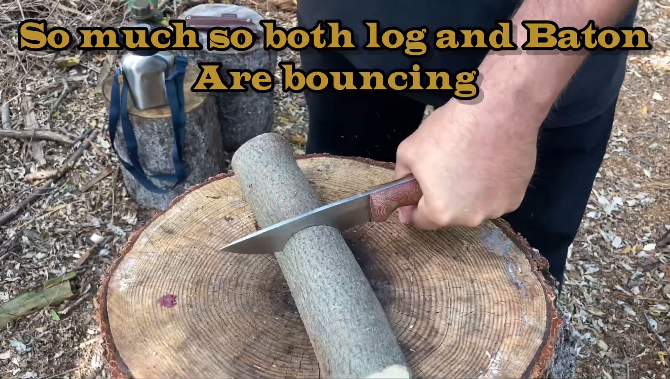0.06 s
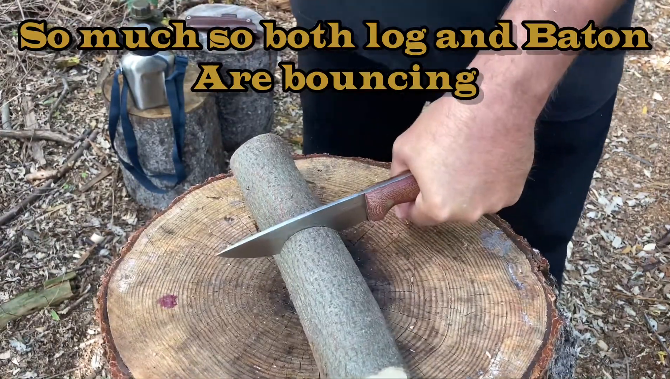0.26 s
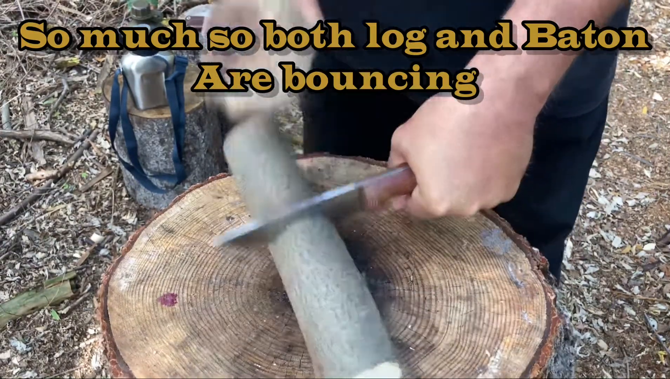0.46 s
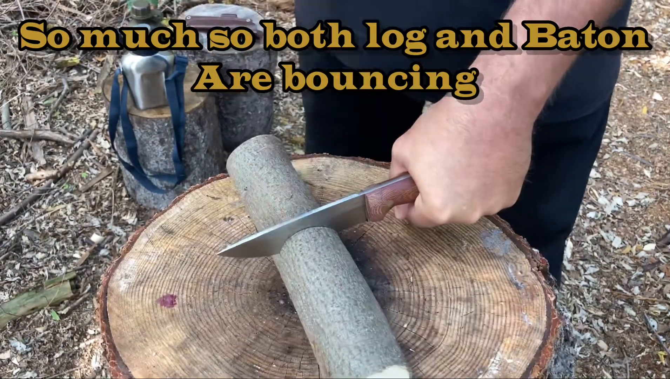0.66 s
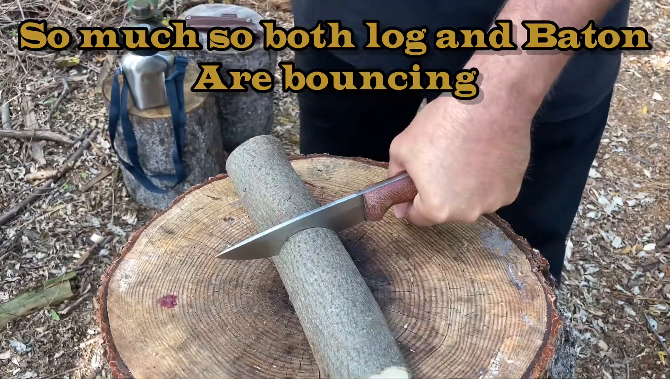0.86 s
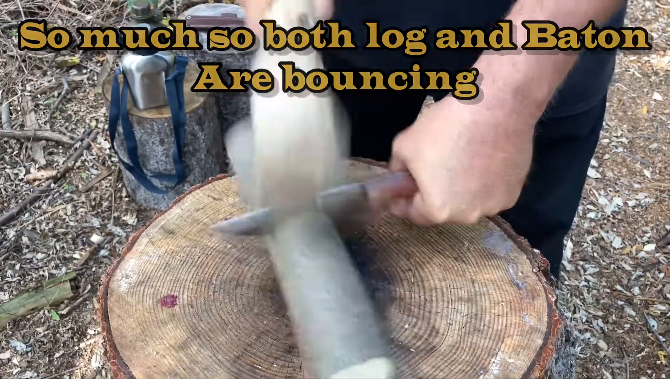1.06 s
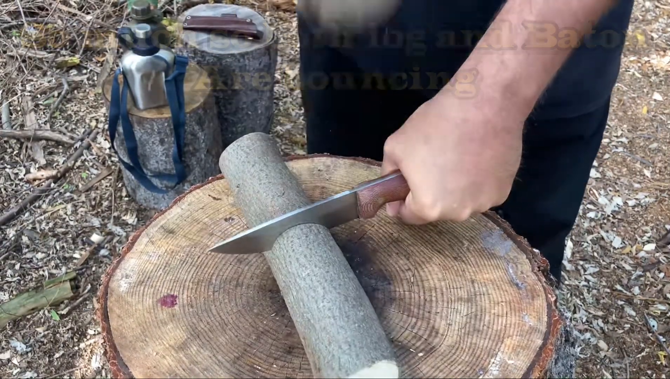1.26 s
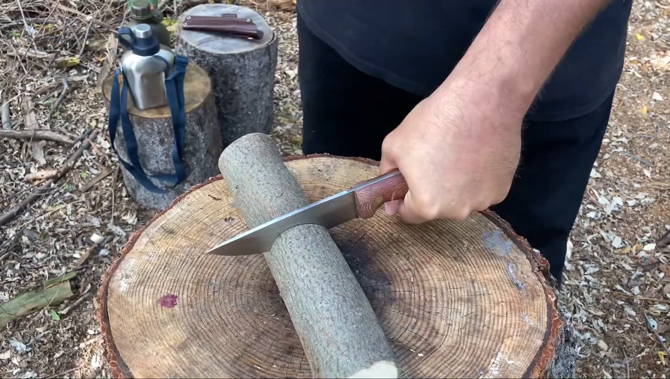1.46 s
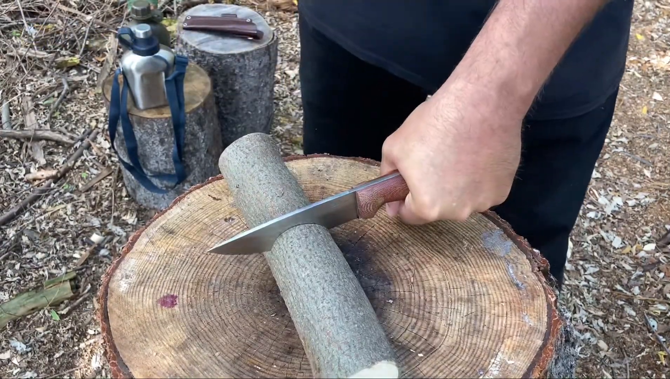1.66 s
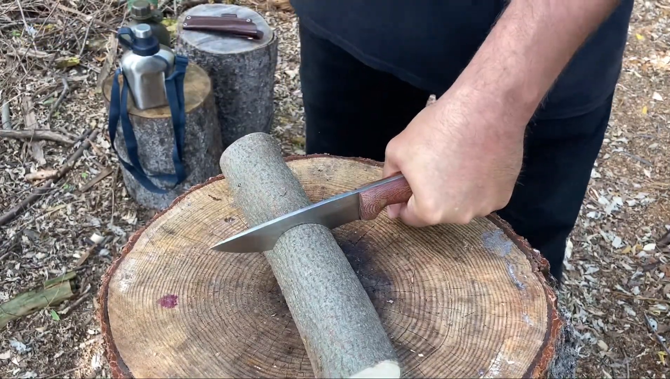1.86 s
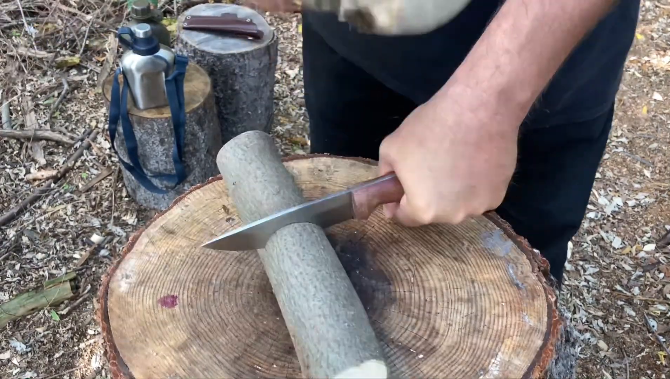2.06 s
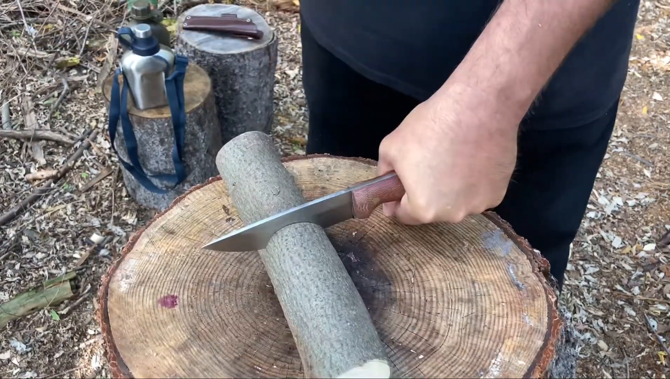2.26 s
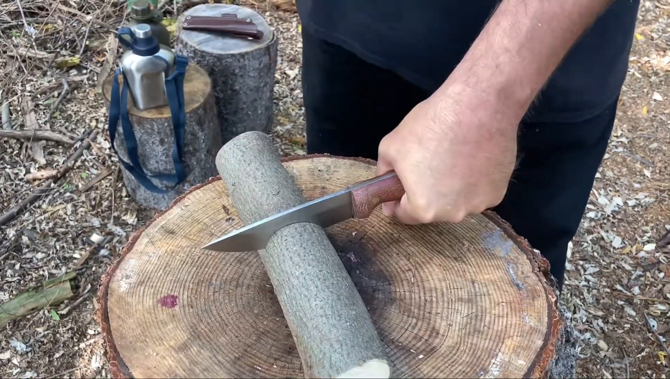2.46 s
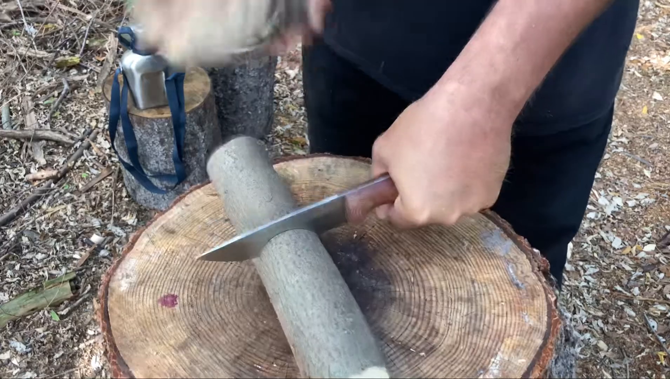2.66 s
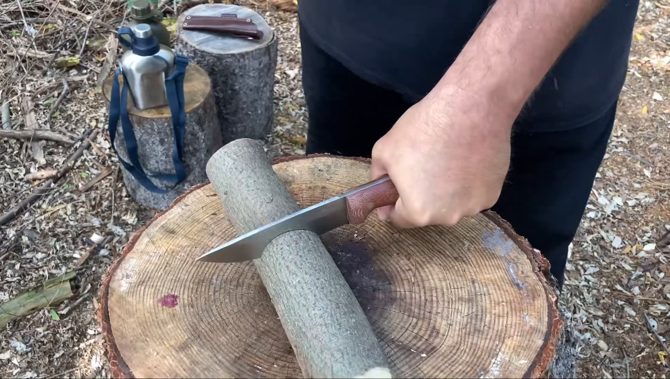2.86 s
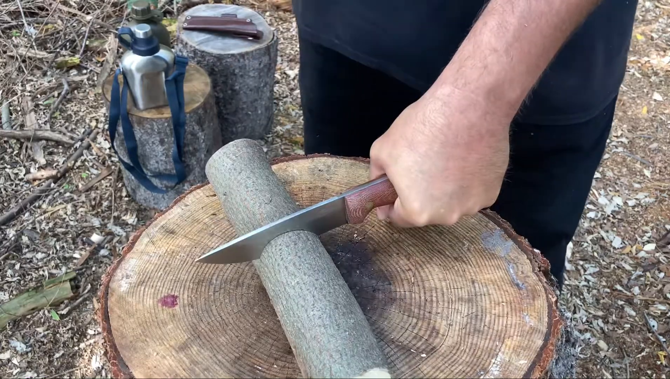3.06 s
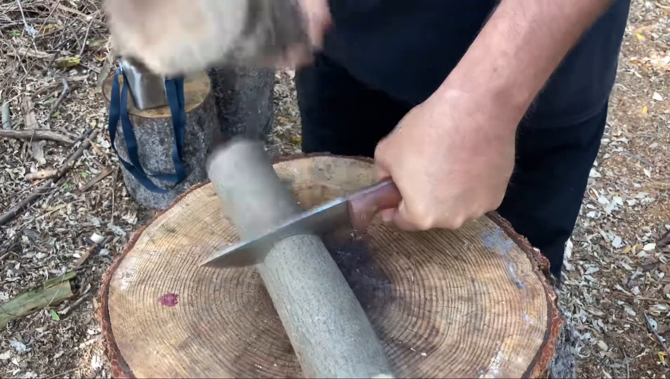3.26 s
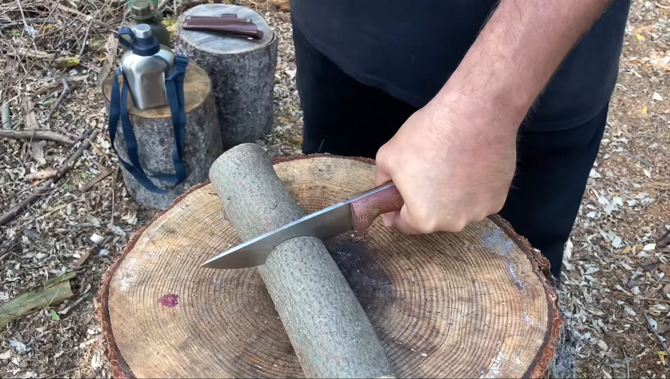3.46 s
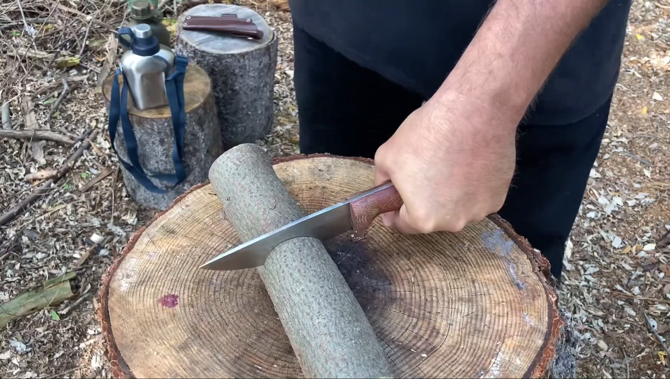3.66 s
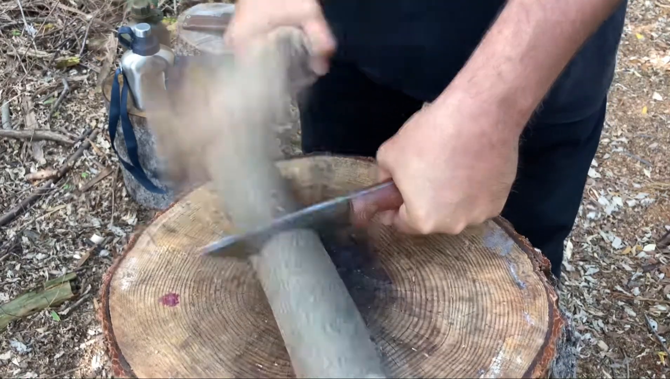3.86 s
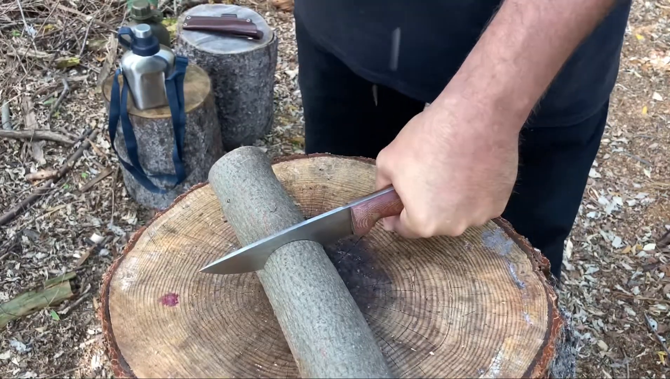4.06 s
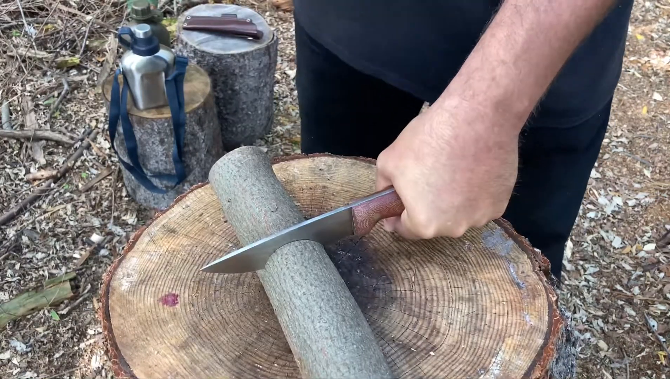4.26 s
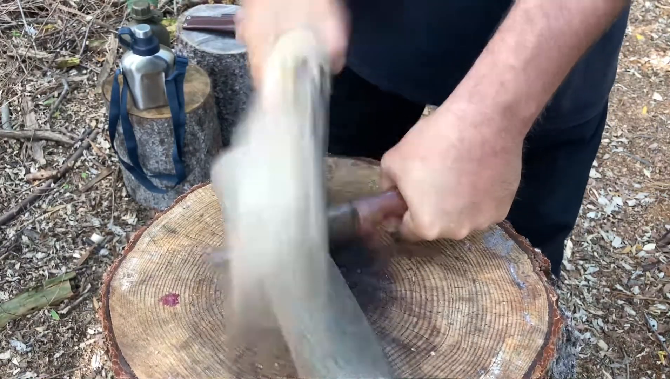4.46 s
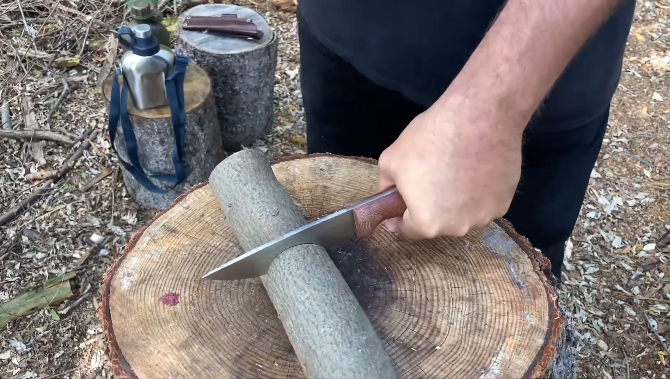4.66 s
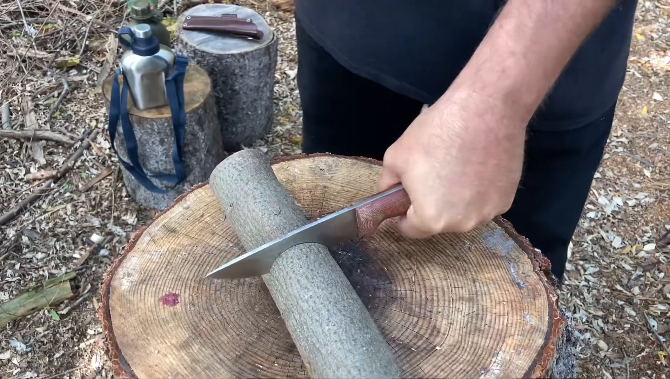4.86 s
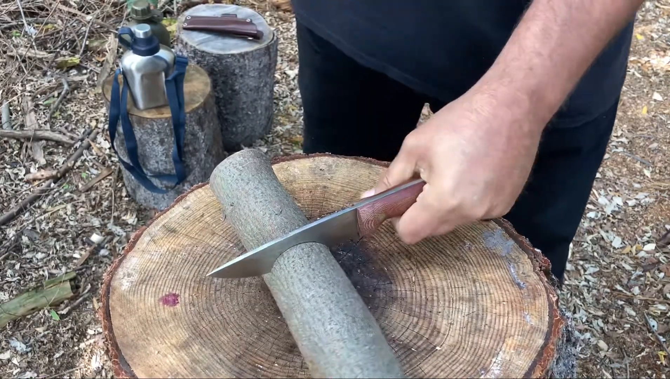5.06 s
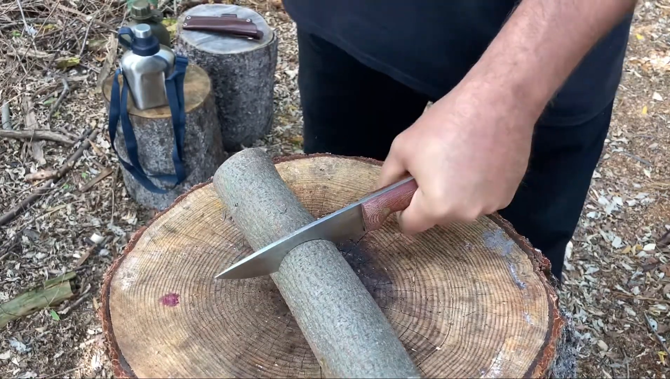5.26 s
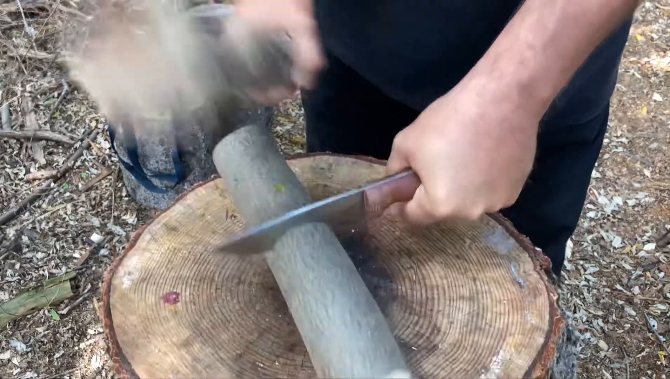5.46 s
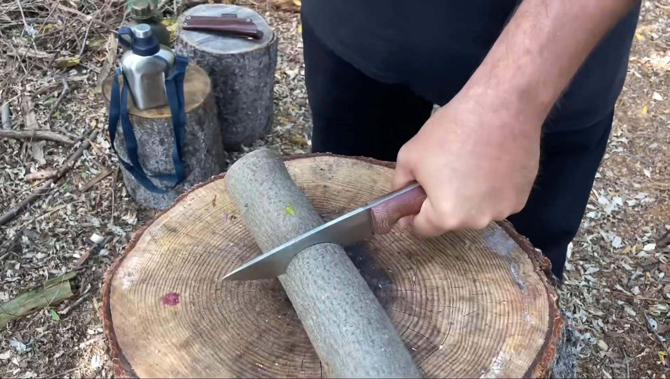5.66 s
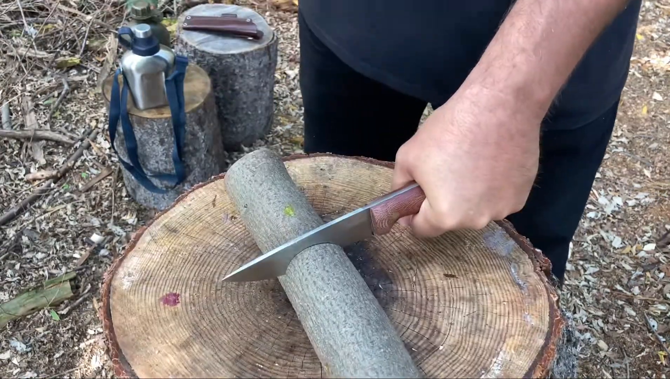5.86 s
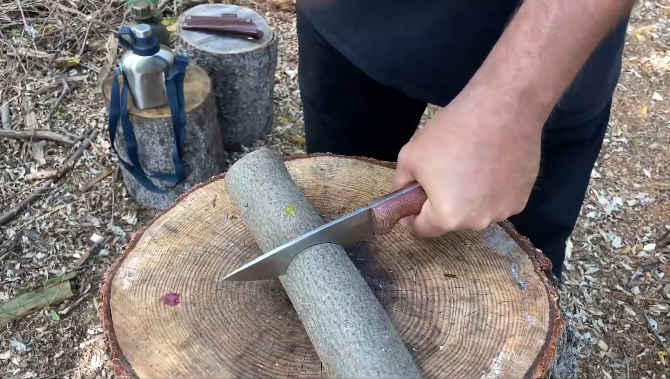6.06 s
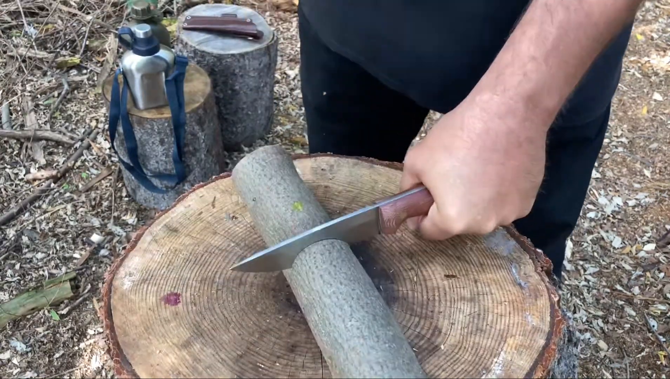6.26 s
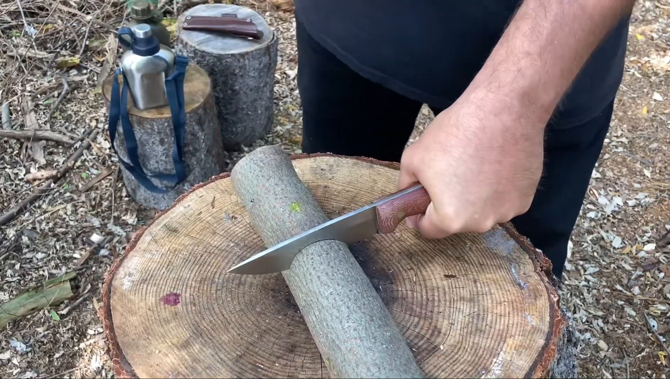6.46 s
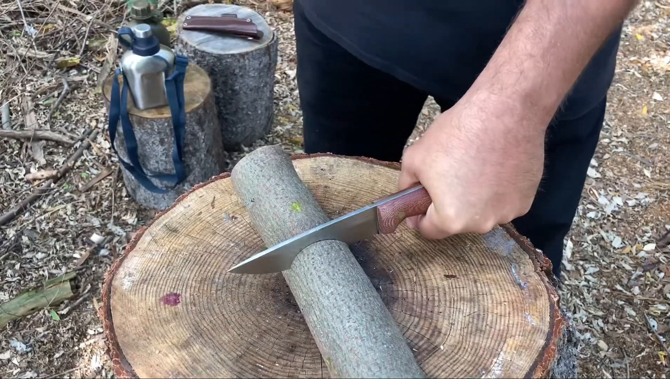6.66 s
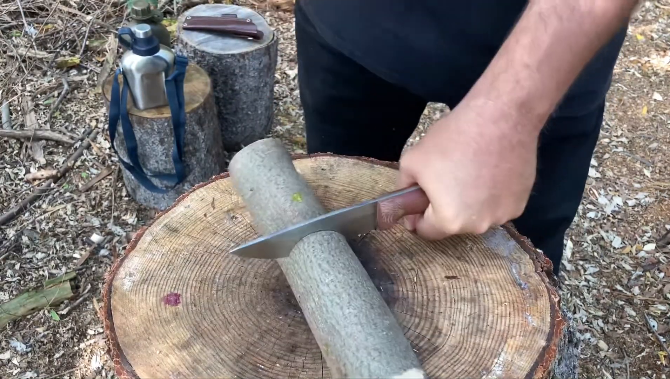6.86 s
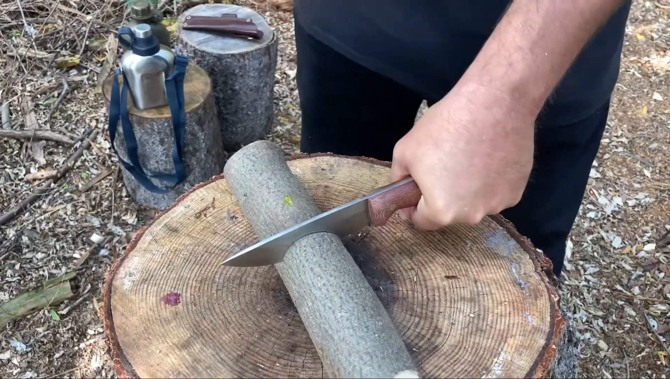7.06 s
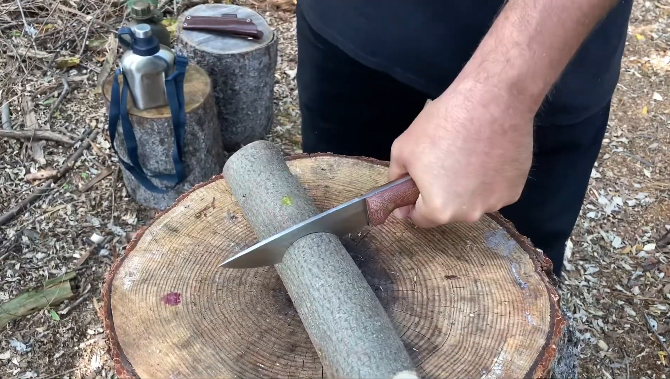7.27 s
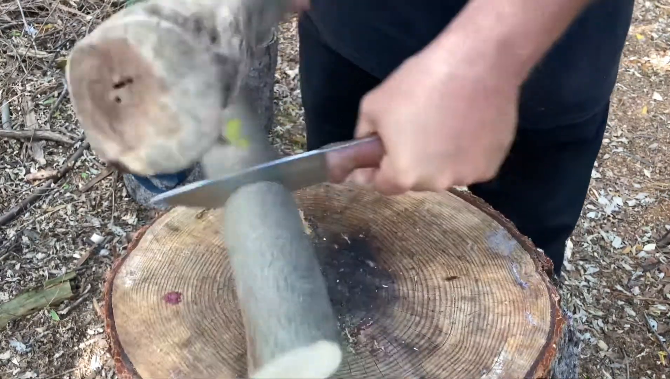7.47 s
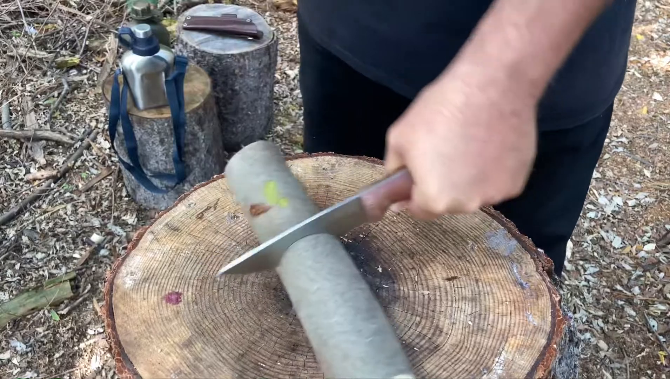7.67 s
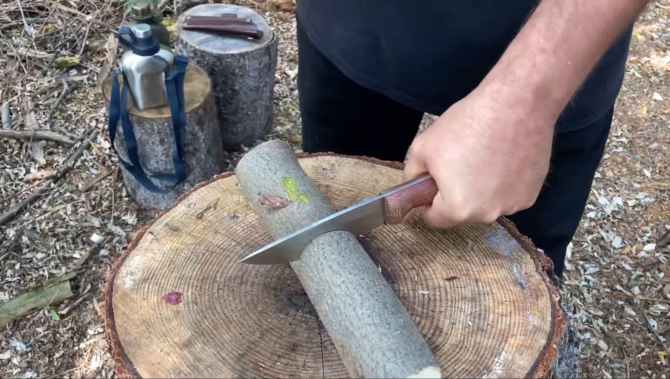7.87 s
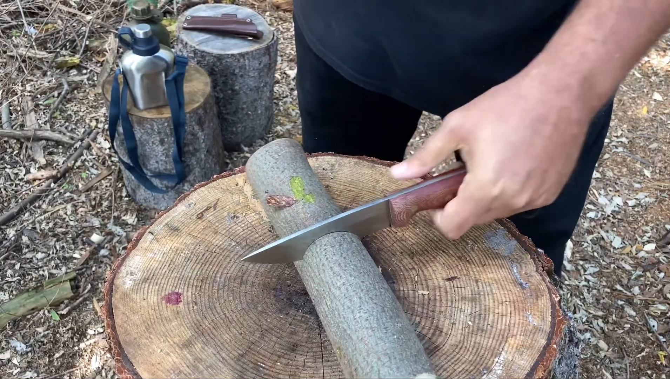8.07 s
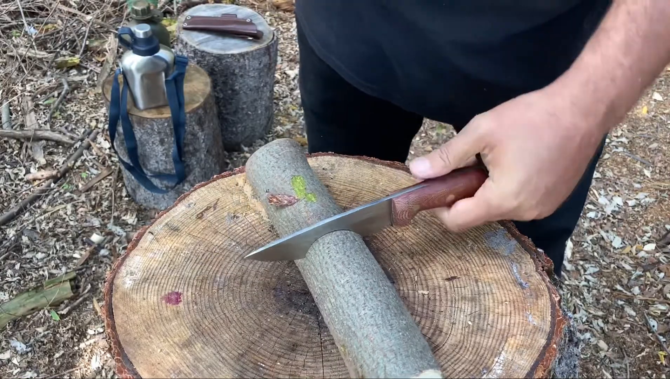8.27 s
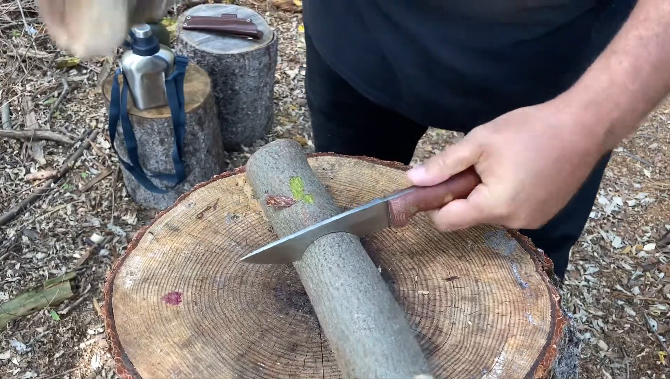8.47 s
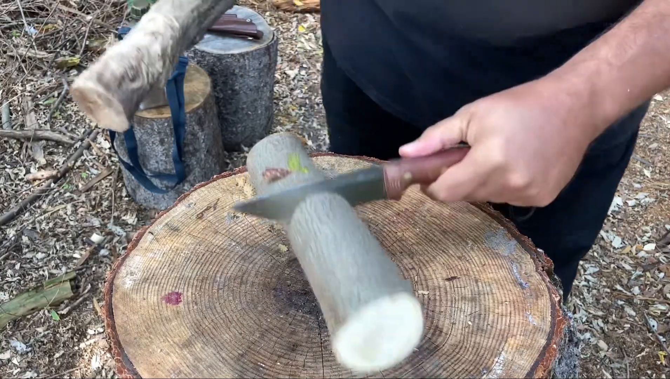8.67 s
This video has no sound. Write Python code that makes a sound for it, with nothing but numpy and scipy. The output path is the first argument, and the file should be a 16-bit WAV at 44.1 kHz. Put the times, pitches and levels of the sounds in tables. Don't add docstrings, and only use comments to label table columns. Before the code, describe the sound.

Close stereo microphones in open woodland, overloaded by each blow. A wooden baton strikes a knife spine eleven times, roughly every two thirds of a second with slightly longer gaps. Each hit is a sharp, hard wooden crack with a short steely ring and stump knock, then the branch bounces with low, dull thuds. Trees return a brief airy echo. Behind lie faint traffic rumble, an engine drone, crickets and thin bird notes.

```python
import sys
import numpy as np
from scipy import signal
from scipy.fft import rfft, irfft, next_fast_len
from scipy.io import wavfile

SR = 44100
rng = np.random.default_rng(int(sys.argv[2]) if len(sys.argv) > 2 else 0)


def field_ratio(decibels):
    return 10 ** (np.asarray(decibels, dtype=float) / 20)


def to_wav(s):
    ch = np.atleast_2d(s).T
    pcm = np.round(np.clip(ch, -1, 1) * 32767)
    wavfile.write(sys.argv[1], SR, pcm.astype(np.int16))


N = 384543
SIZE = next_fast_len(N)
HZ = np.maximum(np.fft.rfftfreq(SIZE, 1 / SR), 1)
TIME = np.arange(N) / SR

# (time [s], engine level [dB], tyre hiss level [dB])
ROAD = [(0.0, -70, -75.5), (0.56, -64, -76), (1.19, -66, -77), (1.6, -70, -79.5), (1.97, -68, -75.5),
        (2.43, -65, -76.5), (2.69, -59.5, -72.5), (3.01, -58, -73.5), (4.44, -62, -68.5),
        (4.75, -64, -74.5), (5.27, -57.5, -74.5), (5.609, -69.5, -74), (7.14, -61.5, -74), (7.34, -60, -72),
        (8.38, -60, -77), (8.72, -57.5, -69)]
# (frequency [Hz], density [dB per Hz])
RUMBLE = [(20, -28.5), (40, -14.5), (50, -3), (65, 1.5), (80, -11.5), (120, -19.5), (200, -40),
          (400, -90.5)]
HISS = [(60, -19.5), (110, -1), (280, -1), (360, -5.5), (700, -7), (1200, -13), (2000, -24), (3500, -32),
        (5200, -35), (8000, -61)]
# (time [s], peak level [dB], length [s])
SWELLS = [(.6, -53, .08), (0.921, -58, .05), (1.781, -55, .14), (3.099, -55.5, .1), (3.66, -51, .09),
          (4.15, -56.5, .2), (4.798, -57, .18), (6.349, -60, .15), (7.997, -53.5, .09), (8.253, -56, .15),
          (8.531, -56, .06)]
# (time [s], peak level [dB], length [s])
PASSING = [
    (3.68, -68, .12),
    (4.25, -67, .2),
    (7.85, -72, .2),
    (8.6, -70, .12),
]
# (frequency [Hz], density [dB per Hz])
TYRE_SONG = [(1300, -32), (1700, -5), (1850, 0), (2050, -12), (3000, -21), (5000, -70)]
# (time [s], peak level [dB], length [s])
TYRE_PASS = [
    (8.45, -78, .2),
]
# (multiple [1], level [dB])
ENGINE = [(4, -8), (6, -1.5), (8, -4), (9, -9), (10, -14.5), (11, -15), (12, -8), (18, -20.5)]
WHINE = [(1, -83), (2, -86.5), (3, -88.5), (4, -88.5), (5, -95)]
# (frequency [Hz], density [dB per Hz])
INSECTS = [(4300, -39.5), (5000, -13.5), (5500, -6.5), (6000, -1.5), (6500, -2), (6900, -6), (7300, -4),
           (8000, -9.5), (8700, -21.5), (11500, -40), (16000, -59.5)]
# (frequency [Hz], level [dB])
DRONES = [(5985, -94), (6530, -93.5), (7300, -94)]
# (time [s], length [s], first frequency [Hz], last frequency [Hz],
# level [dB])
BIRD_NOTES = [(1.269, 0.14, 2940, 2860, -85.5), (1.662, 0.096, 2910, 2770, -82),
              (2.985, .2, 2180, 2290, -80), (8.1, .12, 2980, 2980, -88), (8.39, .1, 2970, 2906, -85),
              (8.545, 0.084, 2940, 2950, -78), (8.655, 0.08, 2950, 2960, -78),
              (8.625, 0.035, 4950, 4750, -82), (8.627, 0.044, 4650, 4550, -83),
              (8.63, 0.052, 4400, 4350, -83), (7.198, 2.07, 8100, 7514, -92)]
# (time [s], level [dB])
LEAVES = [(0.0, -102), (0.36, -99), (0.82, -104), (1.43, -91.5), (1.7, -104), (2.11, -98), (2.57, -103),
          (2.69, -92.5), (3.01, -102), (3.18, -95), (4.27, -104), (5.29, -90.5), (5.56, -101), (6.7, -90),
          (7.14, -99), (7.8, -88.5), (8.02, -100), (8.72, -99)]
# (frequency [Hz], density [dB per Hz])
CLOTH = [(2000, -30), (5000, -8), (8000, -1), (12000, -1), (14000, -8), (16500, -20)]
# (time [s], peak level [dB], length [s])
SHIFTS = [
    (1.4, -91.5, .15),
    (5.1, -89.5, 0.2),
    (7.75, -91.5, .2),
    (8.46, -92.5, .05),
]
# (time [s], peak level [dB], length [s], centre frequency [Hz])
RUSTLES = [(0.749, -61, 0.0066, 4020), (4.857, -72, .008, 4490), (5.06, -66, 0.026, 3200),
           (5.891, -56, 0.0065, 1850), (7.655, -45.5, 0.0019, 4200), (7.705, -64, .004, 3350),
           (5.959, -63.5, .003, 11000), (6.9, -72, .003, 11000), (7.13, -72, .03, 3500),
           (8.45, -73.5, .04, 3000), (8.53, -74, 0.003, 11000), (3.63, -74, .003, 11000),
           (5.75, -74, .003, 11000), (6.26, -73, .003, 11000), (.75, -76, .003, 11000)]
# (frequency [Hz], density [dB per Hz])
NEAR_ECHO = [(200, -12.5), (600, -5), (1100, 0.5), (1450, -9.5), (1720, -1), (2800, -8.5), (6000, -21.5),
             (11500, -35.5)]
FAR_ECHO = [(300, -11.5), (1000, -6.5), (1550, -8), (1720, 4), (1900, -4), (2800, -4.5), (4500, -10),
            (9000, -23)]
LEAF_ECHO = [(3000, -40), (5000, -3), (8000, -1), (12000, -4), (15000, -12)]
# (frequency [Hz], t60 [s])
NEAR_T60 = [(200, 0.22), (800, 0.13), (2000, 0.18), (5000, 0.14), (12000, 0.21)]
FAR_T60 = [(300, 0.35), (1750, 0.91), (3000, 0.46), (9000, 0.17)]
LEAF_T60 = [(4000, .3), (12000, .25)]
# (frequency [Hz], density [dB per Hz])
FORE_COLOUR = [(100, -25.5), (400, -16), (900, -9.5), (1800, 0), (2800, -5.5), (4500, -24), (8000, -33),
               (14000, -40)]
FORE_DB = [3, 2, -0.5, 0.5, 0, 0, -2, 6, 3, -5.5, 5]
# (lead [s], level [dB], three frequencies [Hz, Hz, Hz])
FORELINES = [(.022, -30.5, 2099, 775, 1711), (.014, -33.5, 1754, 2077, 1000), (.015, -35, 1600, 1000, 3413),
             (.016, -35, 1948, 2713, 818), (.016, -41, 2013, 721, 1442), (.014, -35, 1916, 2200, 3402),
             (.029, -36, 1873, 850, 2777), (.024, -29, 2000, 775, 2760), (.017, -35, 2100, 2271, 3466),
             (.01, -48, 1496, 790, 2411), (.017, -32, 870, 2454, 2950)]
# (near end delay [s], level [dB], far end delay [s], level [dB])
BOUNCES = [(0.031, -32.5, .0405, -29.5), (.0365, -34, 0.063, -44), (.0345, -31, .0445, -28),
           (.0345, -32, .0465, -28.5), (.0355, -31, .0475, -33), (.0345, -37, .0465, -35.5),
           (0.045, -33.5, 0.043, -30.5), (.0375, -35.5, .0455, -36), (0.032, -27, .0445, -28.5),
           (0.042, -27, 0.038, -30.5), (0.045, -36.5, 0.053, -33.5)]
# (delay after the blow [s], thud level [dB], knock level [dB])
SETTLES = [(.0755, -43, -46), (.0722, -43, -46), (.054, -40.5, -43), (.086, -46, -55), (.0575, -41, -37.5),
           (.061, -43.5, -50), (.064, -45, -52.5), (.0585, -39.5, -40.5), (.0545, -44.5, -40),
           (.044, -41.5, -56), (.065, -47, -59.5)]
# (time [s], thud level [dB], knock level [dB])
TAPS = [
    (.451, -48, -60),
    (1.985, -45, -31),
    (2.022, -45, -48),
    (3.861, -58, -43.5),
    (5.508, -54.5, -53.5),
    (7.712, -52, -70),
]
# (frequency [Hz], level [dB], t60 [s])
THUD = [(64, -14, 0.062), (163, -7.5, 0.042), (308, -3, 0.014), (380, 2.0, 0.027)]
DULL_KNOCK = [(765, 0, 0.033), (1180, -0.5, .016), (1520, -7.5, .014)]
KNOCK = [(770, -5.5, .04), (1160, -5, 0.036), (1215, -7, 0.034), (1070, 0.5, 0.012), (600, -1, 0.0031),
         (1530, -7, .009)]
LAID = [(345.6, 5, 0.028), (560, 5, 0.0074), (1010, -7.5, 0.02), (756, -10.5, 0.055), (1122, -13, 0.069),
        (1195, -16, .05), (1480, -7, 0.0124), (2300, -12, .006), (2850, -24, .02), (3700, -20, .004)]
# (time [s], crack peak level [dB], then re the crack: stump [dB], branch [dB], fibre snap [dB])
BLOWS = [(0.3991, -4.5, -10.5, -18.5, -20), (1.038, -6, -11.5, -21, -25), (1.945, -1, -12, -14.5, -19),
         (2.5755, -3.5, -10, -11, -24.5), (3.1961, -4.5, -10.5, -11.5, -20.5),
         (3.8236, -3, -14, -26.5, -24), (4.4449, -2.5, -14.5, -13.5, -22.5), (5.414, -1, -19, -18, -29),
         (6.079, -3, -13, -13, -21), (6.726, -2, -15, -14, -27.5), (7.3802, -2, -12.5, -20, -18.5)]
# (share of upper baton mode [0-1], ground peak [dB], blade heel [dB], blade tip [dB])
LANDING = [(0.3, -25.5, -15, -25), (.74, -27.5, -25, -21.5), (.25, -23.5, -14.5, -26.5),
           (0.5, -22.5, -15.5, -22), (0.04, -21.5, -16, -26), (0.5, -23, -15, -20.5),
           (0.5, -22.5, -16, -18.5), (0.6, -22, -16.5, -21), (0.45, -20.5, -15.5, -26.5),
           (0.5, -20, -15.5, -23), (.49, -31.5, -18, -32.5)]
# (upper baton mode [Hz], blade tip [Hz], blade middle [Hz], middle peak [dB], knot [dB])
GRIP = [(1780, 2170, 2800, -17.5, -14), (1780, 2190, 2750, -19, -16.5), (1790, 1900, 2830, -19, -20),
        (1800, 2170, 2760, -20, -18), (1710, 2210, 2790, -19, -20), (1810, 2150, 2870, -18, -15),
        (1740, 2130, 2857, -18.5, -22), (1730, 1900, 2850, -21, -18), (1730, 2110, 2860, -19, -26),
        (1690, 1900, 2830, -21, -22.5), (1700, 2300, 2780, -18, -16.5)]
# (hilt peak [dB], steel tick [dB], extra echo [dB])
BRIGHT = [(-18.5, -27, 0.4), (-26, -36, 0.04), (-26.5, -27, 0.48), (-27, -34, 0.06), (-27, -30, 0.2),
          (-26, -35, -0.2), (-26, -29, 0.6), (-28, -37, 0.06), (-26, -28, -0.12), (-30, -32, -0.36),
          (-25, -28, -0.1)]
# (frequency [Hz], level [dB], t60 [s])
BATON = [(1509, 1.5, 0.011), (1750, 0.67, 0.017)]
SPINE = [(1710, -45, 0.32), (1690, -50, 0.33), (1735, -52, 0.32)]
STUMP = [(344, -5, 0.047), (382.4, 0.5, 0.035)]
BRANCH = [(685, -1, 0.019), (751, 1, .045)]
KNOT = [(570, -1, .012)]
GROUND = [(112.4, 0, 0.073), (140, -1, 0.088)]
# (frequency [Hz], level [dB], t60 [s])
BLADE = [
    [(1102, 0.39, 0.015), (1207, -1, 0.023)],
    [(1840, -2.5, 0.0091), (2147, 8, 0.021), (2343, 7, 0.0058)],
    [(2627, -0.5, 0.019), (2880, 0, 0.021), (3080, -2.5, 0.017)],
    [(3685, 4, 0.022), (4200, -2, 0.021)],
]
BLADE_DB = [4.9, 11, 14, 2]
# (frequency [Hz], density [dB per Hz])
SNAP = [(3500, -20.5), (5600, -3.5), (7000, -1), (8200, -13), (10000, -40.5)]
TICK = [(8000, -29), (9500, -1.5), (11500, -1), (13500, -7.5), (15000, -7), (17000, -21.5)]
# (frequency [Hz], phase [rad])
NEAR_PHASE = [(0, -.2), (400, 0.01), (700, 0.3), (1150, 0.7), (1380, 0.02), (1700, .9), (1900, 1),
              (2120, 2.59), (2400, 2.86), (3190, 1.96), (3880, -.1), (5300, -2.9), (6800, -6.2),
              (16000, -19.2), (22050, -27.8)]
FAR_PHASE = [(0, 0.2), (250, -1.73), (700, -3), (2500, -4.5), (4000, -4.5), (5600, -5), (6800, -5),
             (16000, -20.5), (22050, -27.5)]
# (frequency [Hz], likeness [0-1])
FAR_LIKENESS = [(60, 1), (200, 0.72), (600, 0.86), (1500, 0.59), (5000, 0.74), (7000, 0.22), (9000, 0.96)]
# (frequency [Hz], level difference [dB])
NEAR_TILT = [(100, 0.5), (380, 2.5), (900, -2), (1300, -0.5), (2500, -3), (3700, -8.5), (7000, -1),
             (9000, 3)]
# (frequency [Hz], gain [dB])
KEPT = [(8300, 0), (8600, -25), (9600, -25), (9800, 0), (12500, 0), (13100, -22), (14300, -22),
        (15000, -10)]


def rms_one(x):
    return x / np.sqrt(np.mean(x ** 2) + 1e-20)


def at_hz(points, hz):
    point_hz, value = np.array(points)[:, 0], np.array(points)[:, 1]
    return np.interp(np.log(hz), np.log(point_hz), value)


def filtered(x, response):
    return irfft(rfft(x, SIZE) * response, SIZE)[..., :N]


def drift(rate):
    r = np.exp(-80 * np.pi * rate / SR)
    slow = signal.lfilter([1], [1, -2 * r, r * r], rng.standard_normal(N // 40 + 2002))[2000:]
    return np.interp(np.arange(N) / 40, np.arange(len(slow)), rms_one(slow))


def coloured(spectrum):
    return rms_one(filtered(rng.standard_normal((2, N)), field_ratio(at_hz(spectrum, HZ))))


def bells(rows):
    return sum(field_ratio(db) * np.exp(-((TIME - s) / length) ** 2) for s, db, length in rows)


def right_port(phase, tilt_db=0):
    return field_ratio(tilt_db) * np.exp(-1j * np.interp(HZ, *np.transpose(phase)))


def far(pair):
    alike = np.clip(at_hz(FAR_LIKENESS, HZ), 0, 1)
    mixing = np.array([alike * right_port(FAR_PHASE), np.sqrt(1 - alike ** 2)])
    return np.array([pair[0], filtered(pair, mixing).sum(axis=0)])


def pushes(times, sizes, contact_s):
    clicks = np.zeros(N) + 1e-18
    np.add.at(clicks, np.round(np.asarray(times) * SR).astype(int), sizes)
    n = np.arange(256)
    shape = np.maximum(np.sin(np.pi * n / (contact_s * SR)), 0) * (n < contact_s * SR)
    return signal.oaconvolve(clicks, shape / shape.sum())[:N] + 1e-18


def ring(force, modes):
    out = 0
    for hz, level_db, t60 in modes:
        r, w = field_ratio(-60 / (t60 * SR)), 2 * np.pi * hz / SR
        out = out + signal.lfilter([0, field_ratio(level_db) * np.sin(w)], [1, -2 * r * np.cos(w), r * r], force)
    return out


def ring_each(force, modes, tunes, spread_db=0):
    out, luck = np.zeros(N), spread_db * rng.standard_normal((len(BLOWS), len(modes)))
    for (s, *_), tune, extra in zip(BLOWS, tunes, luck):
        i = int(s * SR)
        for k, (hz, db, t60) in enumerate(modes):
            mode = [(hz * tune, db + extra[k], t60)]
            out[i:i + 4096] += (-1) ** k * ring(force[i:i + 4096], mode)
    return out


def dying(force, t60):
    return signal.lfilter([1], [1, -field_ratio(-60 / (t60 * SR))], force)


def no_bass(x, hz):
    return signal.sosfilt(signal.butter(2, hz, "high", fs=SR, output="sos"), x)


def rumble():
    return (field_ratio(-63 + 2.0 * drift(1.4)) + bells(SWELLS)) * coloured(RUMBLE)


def tyres(hiss_db):
    return (field_ratio(hiss_db + 10.0 + 1.1 * drift(8)) + bells(PASSING)) * coloured(HISS)


def engine(level_db):
    turn = 2 * np.pi * np.cumsum(23.88 * (1 + 0.0008 * drift(0.31))) / SR
    tone = 0
    for k, db in ENGINE:
        tone = tone + field_ratio(db + 1.5 * drift(3.0)) * np.sin(k * turn + rng.uniform(0, 2 * np.pi))
    return field_ratio(level_db + 0.04) * rms_one(tone)


def whine(level_db):
    turn = 2 * np.pi * np.cumsum(427.7 * (1 + 0.00036 * drift(0.86))) / SR
    return sum(field_ratio(level_db + 60.5 + db + 2.3 * drift(2.5)) * np.sin(k * turn) for k, db in WHINE)


def birds():
    out, waver_db, waver_hz = np.zeros(N), 3 * drift(27), 12 * drift(30)
    for s, length, first_hz, last_hz, level_db in BIRD_NOTES:
        on = np.clip(np.minimum(TIME - s, s + length - TIME) / 0.014, 0, 1)
        hz = waver_hz + np.interp(TIME, [s, s + length], [first_hz, last_hz])
        out += on * field_ratio(level_db) * np.sin(2 * np.pi * np.cumsum(hz) / SR)
    return out * field_ratio(waver_db)


def crickets():
    cycle = (TIME + .001) * 10.745 % 1
    gate = np.clip(np.minimum(cycle, .32 - cycle) / 0.051, 0, 1)
    level = field_ratio(-79.0 + 2.5 * drift(2.0) + 1 * drift(60))
    chirp_hz = 5720 + 10 * drift(41) - 60 * (cycle - .18) * (gate > 0)
    song = level * gate * np.sin(2 * np.pi * np.cumsum(chirp_hz) / SR)
    for hz, level_db in DRONES:
        song += field_ratio(level_db + 4.0 * drift(14)) * np.sin(2 * np.pi * np.cumsum(hz + 25 * drift(43)) / SR)
    return song * field_ratio([[0], [3.5]]) + field_ratio(-80.5 + 1.1 * drift(6)) * far(coloured(INSECTS))


def leaves():
    level_db = np.interp(TIME, *np.transpose(LEAVES)) + 1.7 + 4.9 * drift(6)
    return field_ratio(level_db) * coloured([(9000, -60.5), (9700, 0), (11500, 1), (12600, -3), (13500, -60)])


def ducking():
    drop_db, recover_s = -8.5, 0.12
    since = TIME - np.array(BLOWS)[:, :1]
    return field_ratio(drop_db * np.sum((since > 0) * np.exp(-(since / recover_s) ** 2), axis=0))


def cloth():
    swing_db, rise_db_per_s = -76.5, 150
    early = np.array(BLOWS)[:, :1] - TIME
    swing = np.sum((early > 0) * field_ratio(swing_db - rise_db_per_s * np.abs(early)), axis=0)
    return (swing + bells(SHIFTS)) * field_ratio(4 * drift(15)) * coloured(CLOTH)


def rustles():
    out, grains = np.zeros(N), rng.standard_normal(N) * rng.exponential(1, N)
    for s, peak_db, length, hz in RUSTLES:
        i, n = int(s * SR), int(.15 * SR)
        age = TIME[:n][:N - i] / length
        puff = age * np.exp(1 - age) * grains[i:i + n] * field_ratio(peak_db)
        octave = signal.butter(2, [hz / 1.4, hz * 1.3], "band", fs=SR, output="sos")
        out[i:i + n] += signal.sosfilt(octave, puff)
    return out


def echo(spectrum, t60s, level_db, build_s, channels):
    crack_db, extra_db = np.array(BLOWS)[:, 1], np.array(BRIGHT)[:, 2]
    size_db = 0.18 * crack_db + extra_db + level_db - 3.0
    force = pushes(np.array(BLOWS)[:, 0], field_ratio(size_db), build_s)
    streaks_db = 4.0 * np.interp(HZ / 70, np.arange(500), rng.standard_normal(size=500))
    noise, out = rfft(coloured(spectrum)[:channels], SIZE) * field_ratio(streaks_db - 0.23), 0
    for centre in 150 * 2 ** np.arange(0, 7):
        band = np.maximum(1 - np.abs(np.log2(HZ / centre)), 0)
        out = out + dying(force, at_hz(t60s, centre)) * irfft(noise * band, SIZE)[:, :N]
    return out


def fore_swell():
    lead_s, left_db, right_db = 0.012, -41, -32
    out = np.zeros((2, N))
    pitches = 150 * 60 ** rng.random((len(BLOWS), 2, 24, 1))
    turns = rng.random((len(BLOWS), 2, 24, 1))
    for (s, *_), db, hz, turn in zip(BLOWS, FORE_DB, pitches, turns):
        i, j = int((s - .035) * SR), int((s + .002) * SR)
        early = TIME[i:j] - s
        swell = np.clip((early + lead_s) / 0.0027, .08, 1) * field_ratio(370 * np.minimum(early, 0))
        swell = swell * np.clip((early + .035) / .01, 0, 1)
        lines = (field_ratio(at_hz(FORE_COLOUR, hz)) * np.sin(2 * np.pi * (hz * early + turn))).sum(axis=1)
        out[:, i:j] = swell * field_ratio(db) * field_ratio([[left_db], [right_db]]) * rms_one(lines)
    return out


def forelines():
    out = np.zeros((2, N))
    for (s, *_), (lead, db, *hz) in zip(BLOWS, FORELINES):
        i, j = int((s - .04) * SR), int((s + .001) * SR)
        early = TIME[i:j] - s
        lines = sum(field_ratio(-3.5 * k) * np.sin(2 * np.pi * f * early) for k, f in enumerate(hz))
        swell = np.clip((early + lead) / 0.0044, 0, 1) * field_ratio(500 * early + db)
        out[:, i:j] = swell * field_ratio([[-12], [0]]) * lines
    return out


def bounces():
    blow = np.array(BLOWS)[:, 0]
    near_s, near_db, far_s, far_db = np.transpose(BOUNCES)
    settle_s, settle_db, knock_db = np.transpose(SETTLES)
    tap_s, tap_db, tap_knock_db = np.transpose(TAPS)
    lands, settles = np.hstack([blow + near_s, blow + far_s]), np.hstack([blow + settle_s, tap_s])
    thud_s = np.hstack([lands, settles + 0.00084])
    thud_db = np.hstack([near_db, far_db, settle_db, tap_db]) + 7.5
    out = ring(pushes(thud_s, field_ratio(thud_db), .0028), THUD)
    dull_db = np.hstack([near_db - 9, far_db - 12])
    out += ring(pushes(lands, field_ratio(dull_db), 0.00058), DULL_KNOCK)
    ringing_db = np.hstack([knock_db, tap_knock_db]) + 4.5
    out += ring(pushes(settles - .0009, field_ratio(ringing_db), 0.00066), KNOCK)
    laid = ring(pushes([7.6575], field_ratio(-30.5), 0.00031), LAID)
    return no_bass(out, 53) + no_bass(laid, 430)


def baton(s, crack_db, share, upper_hz):
    out = np.zeros(N)
    upper_lag = 0.0018 * np.clip(2 - 2.5 * share, 0, 1)
    stages = [(.00025, 3.2), (.00088, 1.5), (.0015, .4)]   # (delay [s], level [dB])
    lower = (BATON[0], 1 - share, s ** 0, 0)
    upper = (BATON[1], share, upper_hz / BATON[1][0], upper_lag)
    for mode, part, tune, lag in (lower, upper):
        times = [s + lag + late_s for late_s, db in stages]
        sizes = [part * field_ratio(crack_db + db) for late_s, db in stages]
        out += ring_each(pushes(np.ravel(times), np.ravel(sizes), 0.00019), [mode], tune)
    return out


def blade(s, heel_db, group_db, tip_hz, middle_hz):
    out = ring(pushes(s + .00086, field_ratio(heel_db + BLADE_DB[0]), .0001), BLADE[0])
    tip, middle = tip_hz / BLADE[1][1][0], middle_hz / BLADE[2][1][0]
    for group, level_db, drive_db, tune in zip(BLADE[1:], group_db, BLADE_DB[1:], (tip, middle, middle)):
        force = pushes(s + .00086, field_ratio(level_db + drive_db), .0001)
        out += ring_each(force, group, tune, spread_db=2.5)
    return out


def blows():
    s, crack_db, stump_db, branch_db, snap_db = np.transpose(BLOWS)
    share, ground_db, heel_db, tip_db = np.transpose(LANDING)
    upper_hz, tip_hz, middle_hz, middle_db, knot_db = np.transpose(GRIP)
    hilt_db, tick_db, _ = np.transpose(BRIGHT)
    share = np.clip(share, 0, 1)
    crack = ring(pushes(s + 0.00095, share * field_ratio(crack_db), 0.00026), SPINE)
    crack += baton(s, crack_db, share, upper_hz)
    crack += blade(s, heel_db, [tip_db, middle_db, hilt_db], tip_hz, middle_hz)
    tear = pushes(s + 0.00079, field_ratio(crack_db + snap_db + 9.0), 0.00059)
    crack += dying(tear, 0.01) * coloured(SNAP)[0]
    tick = pushes(s + 0.00062, field_ratio(tick_db + 8.0), 0.00033)
    crack += dying(tick, 0.0071) * coloured(TICK)[0]
    body = ring(pushes(s + .0019, field_ratio(crack_db + stump_db + 9.5), 0.0016), STUMP)
    body += ring(pushes(s + .0011, field_ratio(knot_db), 0.00026), KNOT)
    body += ring(pushes(s + .0011, field_ratio(crack_db + branch_db + 8), 0.0003), BRANCH)
    ground = ring(pushes(s + .0015, field_ratio(ground_db + 2.5), 0.0046), GROUND)
    return no_bass(crack, 600) - no_bass(no_bass(body, 300), 180) + no_bass(no_bass(ground, 70), 60)


def scene():
    s, *levels = np.transpose(ROAD)
    engine_db, hiss_db = [np.interp(TIME, s, c) for c in levels]
    scatter = field_ratio(2.0 * drift(70))
    kept = field_ratio(at_hz(KEPT, HZ))
    port = right_port(NEAR_PHASE, at_hz(NEAR_TILT, HZ))
    near_echo = scatter * echo(NEAR_ECHO, NEAR_T60, -29.0, 0.002, channels=1)[0]
    wood = blows() + filtered(bounces() + rustles() + near_echo, kept)
    near = np.array([wood, filtered(wood, port)]) + fore_swell() + forelines()
    road = rumble() + tyres(hiss_db) + engine(engine_db) + whine(engine_db)
    distance = road + birds() + bells(TYRE_PASS) * coloured(TYRE_SONG)
    trees = field_ratio(1 * drift(25)) * echo(FAR_ECHO, FAR_T60, -48.5, 0.0046, channels=2)
    trees = trees + scatter * echo(LEAF_ECHO, LEAF_T60, -54.5, .006, channels=2)
    gain = ducking()
    return near + filtered(far(gain * distance + trees) + gain * crickets() + cloth() + leaves(), kept)


def low_pass(x):
    return signal.sosfilt(signal.butter(12, 16510, fs=SR, output="sos"), x)


def record(dry):
    top_cut = signal.cheby2(8, 40, 16600, fs=SR, output="sos")
    limited = signal.sosfiltfilt(top_cut, np.clip(dry, -1.1, 1.1))
    mix = np.clip(limited, -1, 1)
    return low_pass(mix)


dry = scene()
out = record(dry)
to_wav(out)
```